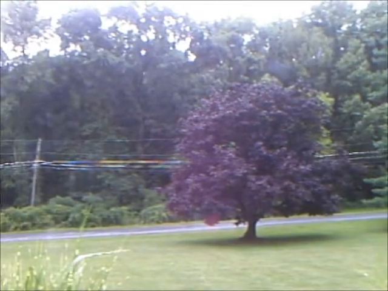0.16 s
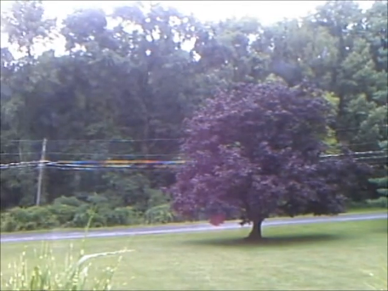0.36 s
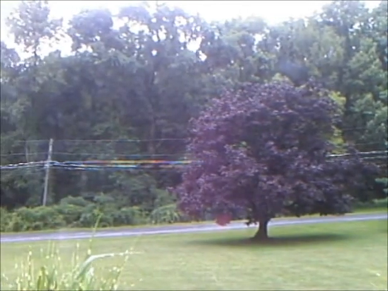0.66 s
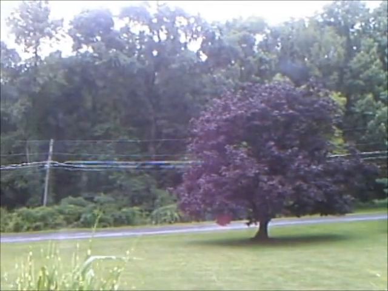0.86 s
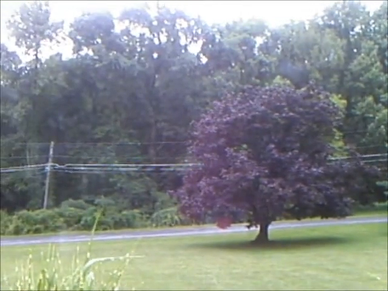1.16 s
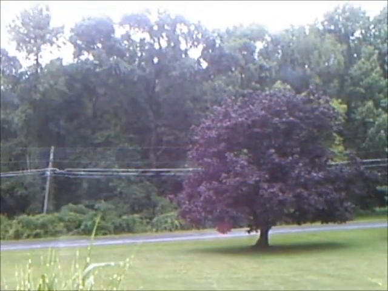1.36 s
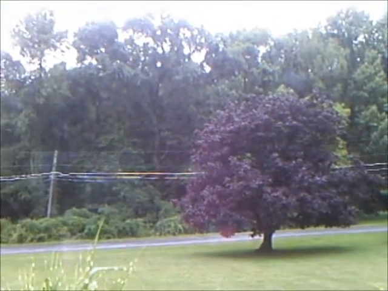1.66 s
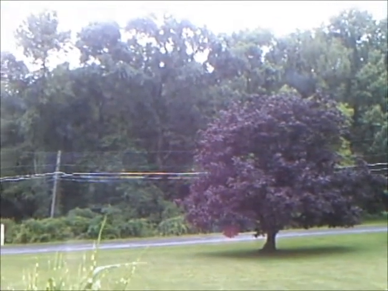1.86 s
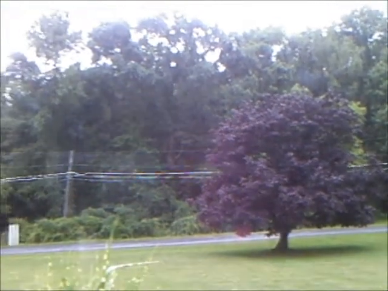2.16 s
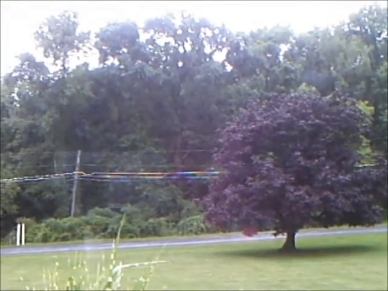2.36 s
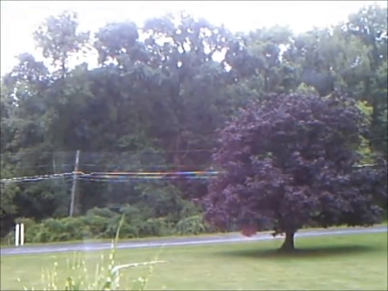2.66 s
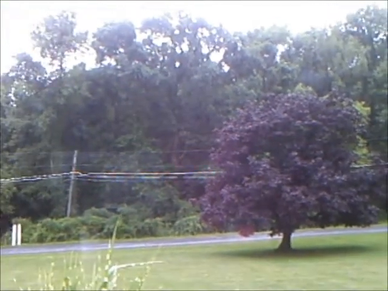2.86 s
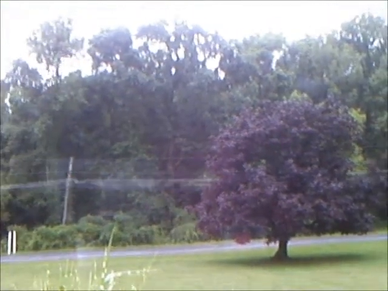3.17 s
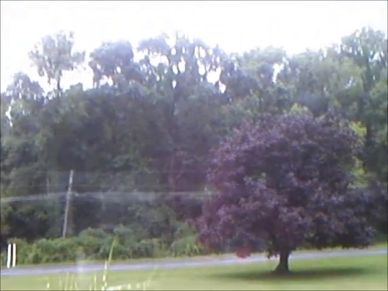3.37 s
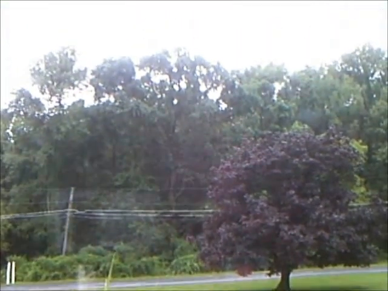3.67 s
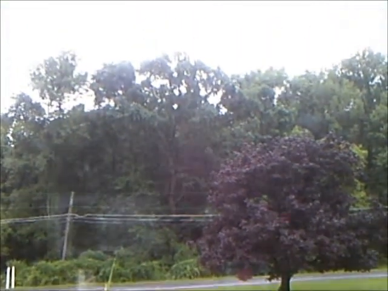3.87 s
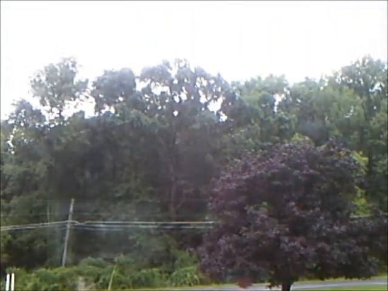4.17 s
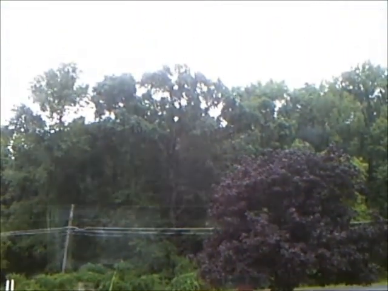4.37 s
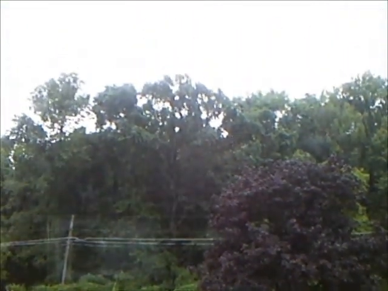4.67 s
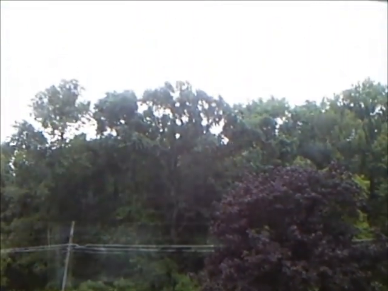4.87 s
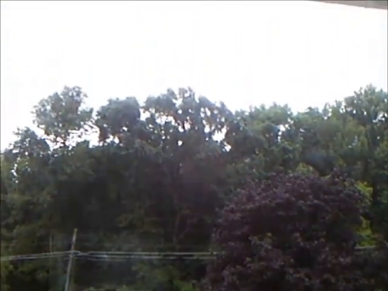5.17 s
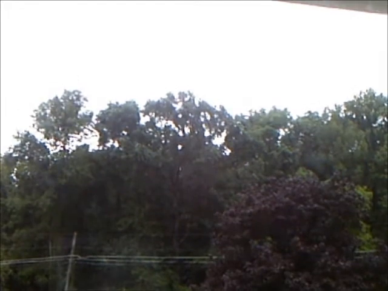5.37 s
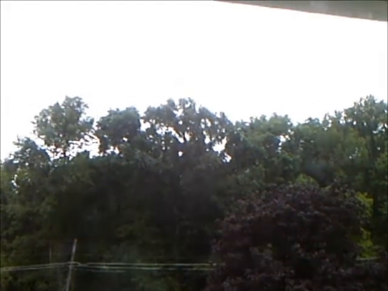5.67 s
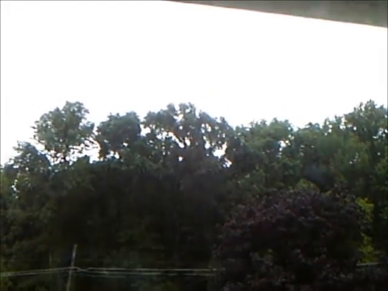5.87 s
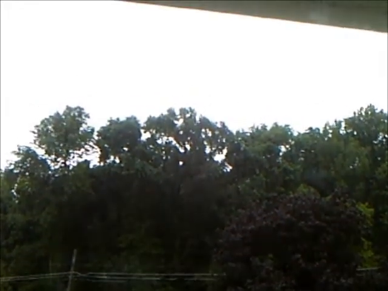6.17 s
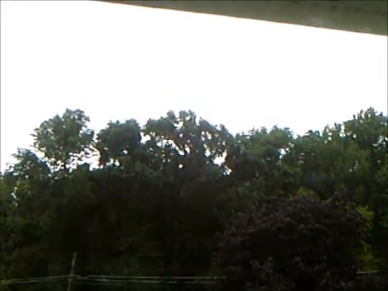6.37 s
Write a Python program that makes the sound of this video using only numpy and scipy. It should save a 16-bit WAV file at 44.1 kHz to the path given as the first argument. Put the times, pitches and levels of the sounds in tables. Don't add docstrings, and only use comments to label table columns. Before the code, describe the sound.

Mono, outdoors from a sheltered porch: steady wash of wind in distant foliage, hollow and slightly coloured by the porch, over low rumble and irregular buffeting puffs. Near leaves hiss lightly. A wavering motor drone is strongest at first, then recedes. A cricket chirps about three times a second, a katydid pulses very high, and electrical hum and buzz sit underneath. Wind slackens after three seconds and picks up around six.

```python
import sys
import numpy as np
from scipy import signal
from scipy.io import wavfile
from scipy.ndimage import uniform_filter1d

SR = 44100
rng = np.random.default_rng(int(sys.argv[2]) if len(sys.argv) > 2 else 0)


def master_out(mix):
    frames = np.transpose(np.atleast_2d(mix))
    ceiling = np.clip(frames, -1, 1)
    pcm = np.round(ceiling * 32767).astype(np.int16)
    wavfile.write(sys.argv[1], SR, pcm)


def decibels_to_gain(level_db):
    exponent = np.asarray(level_db, float) / 20
    return 10 ** exponent


N = 287091
STEP = 128
TIME = np.arange(N) / SR
SLOW = np.arange(0, N + STEP, STEP) / SR


def rms_one(x):
    return x / np.sqrt(np.mean(x ** 2) + 1e-20)


def columns(rows, s):
    at, *values = np.transpose(rows)
    return [np.interp(s, at, v) for v in values]


def drift(rate_hz):
    r = np.exp(-2 * np.pi * rate_hz * STEP / SR)
    white = rng.standard_normal(len(SLOW) + 1000)
    return rms_one(signal.lfilter([1], [1, -2 * r, r * r], white)[1000:])


def audio_rate(control):
    return np.interp(TIME, SLOW, control)


def wind(patchy_db=.8, flicker_db=.5, lumpy_db=.6):
    low, middle = np.geomspace(13, 450, 25), np.geomspace(450, 8350, 44)[1:]
    edges_hz = np.r_[low, middle, 9300, 10500, 12500, 14500, 17000]
    hz, width_hz = np.sqrt(edges_hz[1:] * edges_hz[:-1]), np.diff(edges_hz)
    near_db, far_db = wind_strength_db()
    air_db = puffs_db()
    power = buffeting(near_db, air_db, hz, width_hz) + rumble(near_db, air_db, hz, width_hz)
    power = power + foliage(far_db, hz, width_hz) + leaves(hz, width_hz)
    power = power + microphone_hiss(hz, width_hz) + gusts(hz, width_hz)
    power = power + porch_resonances(hz, width_hz) + rustles(hz, width_hz)
    power = power + low_noises(hz, width_hz) + twig(hz, width_hz)

    patches = uniform_filter1d([drift(2.0) for _ in hz], size=4, axis=0) * 2
    depth_db = patchy_db * (hz < 8400) + lumpy_db * (hz < 250)
    white = rng.standard_normal((3, N + SR // 2))
    out = np.zeros(N)
    for k, band_hz in enumerate(zip(edges_hz, edges_hz[1:])):
        band = signal.butter(2, band_hz, "band", fs=SR, output="sos")
        noise = signal.sosfilt(band, white[k % 3])[SR // 2:]
        gain = np.sqrt(power[k]) * decibels_to_gain(depth_db[k] * patches[k] + flicker_db * drift(14))
        out += audio_rate(gain) * rms_one(noise)
    return out


# time in seconds, rumble at the porch in dB, roar in the far trees in dB.
WIND = [
    (0, -30.5, -43),
    (.3, -33.5, -42.5),
    (.55, -37, -42),
    (1.3, -37, -41),
    (2.2, -38, -41.5),
    (3.1, -42, -44),
    (4, -42.5, -45),
    (5.6, -43.5, -46.5),
    (6.2, -41.5, -45),
    (6.51, -39.5, -46),
]


def wind_strength_db():
    return columns(WIND, SLOW)


# centre in seconds, half length in seconds, change in dB.
PUFFS = [(0.102, .1, 5.5), (.4, 0.091, 7), (1.16, 0.025, 3), (1.425, 0.078, 9.5), (1.745, 0.073, -6),
         (1.9, 0.14, 4), (2.29, 0.068, -7), (2.83, .12, 2), (3.337, 0.089, 1.5), (3.943, 0.055, -7),
         (4.2, 0.14, 3), (4.45, .04, -10), (4.56, 0.045, 4.5), (5.424, 0.13, 7), (5.797, .05, 5),
         (6.33, .06, 3.5)]


def puffs_db():
    return sum(db * np.exp(-.5 * ((SLOW - s) / half_s) ** 2) for s, half_s, db in PUFFS)


def layer(spectrum, level_db, hz, width_hz):
    at_hz, db = np.transpose(spectrum)
    density_db = np.interp(np.log(hz), np.log(at_hz), db, left=-200, right=-200)
    power = decibels_to_gain(density_db) ** 2 * width_hz
    return (power / power.sum())[:, None] * decibels_to_gain(level_db) ** 2


# frequency in Hz, density in dB per Hz.
BUFFETING = [(10, -10), (14, -8), (23, -4), (33, -11), (44, 0), (52, -8), (62, -12), (70, -22), (90, -50)]


def buffeting(near_db, air_db, hz, width_hz, mean_db=-38, follows=.6):
    level_db = mean_db + follows * (near_db - near_db.mean()) + air_db
    return layer(BUFFETING, level_db, hz, width_hz)


# frequency in Hz, density in dB per Hz.
RUMBLE = [(45, -20), (66, -3), (90, 0), (110, -2), (150, -.5), (190, -2.5), (250, -3), (300, -6),
          (380, -12), (480, -21), (620, -45)]


def rumble(near_db, air_db, hz, width_hz, puff_share=0.11):
    return layer(RUMBLE, near_db + puff_share * air_db, hz, width_hz)


# frequency in Hz, density in dB per Hz.
FOLIAGE = [(300, -40), (450, -8), (600, -5), (760, -4.5), (880, 2), (1050, -5), (1250, -4.5), (1440, -7.5),
           (1620, -9.5), (1760, -11.5), (2300, -15), (3000, -19.5), (3500, -23.5), (4400, -52)]


def foliage(far_db, hz, width_hz):
    return layer(FOLIAGE, far_db, hz, width_hz)


# frequency in Hz, density in dB per Hz.
LEAVES = [(2200, -22), (3100, -5), (3800, -2.5), (5200, -2), (5900, 0), (6550, -1), (7000, -5), (7700, -7),
          (8200, -9), (8700, -30), (10000, -45)]


def leaves(hz, width_hz, level_db=-59.5):
    return layer(LEAVES, level_db, hz, width_hz)


# frequency in Hz, density in dB per Hz.
MICROPHONE = [(3000, -2), (8000, 1.5), (12000, 2), (16000, 0.5)]


def microphone_hiss(hz, width_hz, level_db=-66.5):
    return layer(MICROPHONE, level_db, hz, width_hz)


def hump(centre_hz, octaves, level_db, hz, width_hz):
    away = np.abs(np.log2(hz[:, None] / centre_hz) / octaves)
    shape = np.exp(-.5 * away ** 2.63) * (width_hz / hz)[:, None]
    return decibels_to_gain(level_db) ** 2 * shape / shape.sum(axis=0)


def swell_db(start_s, end_s, level_db, rise_db_per_s=45, fall_db_per_s=33):
    early_s, late_s = np.maximum(start_s - SLOW, 0), np.maximum(SLOW - end_s, 0)
    return level_db - rise_db_per_s * early_s - fall_db_per_s * late_s


def fixed_humps(rows, hz, width_hz):
    return sum(hump(centre_hz, octaves, swell_db(start_s, end_s, db), hz, width_hz)
               for start_s, end_s, centre_hz, octaves, db in rows)


# full from and to in seconds, first and last centre in Hz, level in dB.
GUSTS = [
    (-.1, 0.26, 770, 830, -40.5),
    (1.352, 2.29, 2420, 1910, -50),
    (2.4, 3.4, 1570, 1190, -49.5),
    (6.043, 6.43, 1233, 1030, -39),
]


def gusts(hz, width_hz):
    power = 0
    for start_s, end_s, from_hz, to_hz, db in GUSTS:
        centre_hz = np.interp(SLOW, [start_s, end_s], [from_hz, to_hz])
        level_db = swell_db(start_s, end_s, db, rise_db_per_s=66, fall_db_per_s=28)
        power = power + hump(centre_hz, .26, level_db, hz, width_hz)
    return power


# full from and to in seconds, centre in Hz, spread in octaves, level in dB.
RIDGES = [(-.1, .0, 453.6, 0.65, -39.5), (1.1, 0.41, 420, 0.64, -49), (0.473, 0.71, 885, 0.12, -38.5),
          (0.79, 0.82, 956, 0.2, -42.5), (0.99, 1.14, 860, 0.19, -45), (1.3, 2.34, 1255, .06, -49.5),
          (2.5, 3.06, 1232, 0.048, -47.5), (3.34, 4.34, 1250, .06, -51.5), (4.5, 5.106, 1210, 0.16, -48.5),
          (5.3, 6.14, 1215, 0.11, -53.5), (.9, 2.1, 1680, 0.053, -56.5), (2.34, 3.34, 1540, 0.047, -54),
          (3.46, 6.6, 1525, 0.038, -57.5), (-.1, 1.06, 2007, 0.033, -59.5), (1.3, 2.2, 2050, .036, -56),
          (-.1, 1.24, 2620, .04, -64.5), (3.06, 4.5, 2550, .03, -61.5), (5.0, 5.7, 2450, 0.12, -60),
          (-.1, 0.56, 4330, 0.086, -61.5), (1.0, 1.49, 4400, .06, -65), (1.66, 3.5, 4350, 0.075, -68.5)]


def porch_resonances(hz, width_hz):
    return fixed_humps(RIDGES, hz, width_hz)


# full from and to in seconds, centre in Hz, spread in octaves, level in dB.
RUSTLES = [
    (-.1, 1.4, 4800, .47, -59),
    (1.08, 1.28, 5200, .55, -62),
    (4.25, 4.95, 4300, .4, -65),
    (5.75, 6.6, 5000, .55, -64),
    (.45, .9, 7560, .055, -73),
    (1.1, 1.3, 7700, .07, -67),
]


def rustles(hz, width_hz):
    return fixed_humps(RUSTLES, hz, width_hz)


# full from and to in seconds, centre in Hz, spread in octaves, level in
# dB.
LOW_NOISES = [
    (3.2, 3.46, 20, 0.42, -37.5),
    (2.8, 6.6, 88, 0.21, -49),
    (3.65, 3.85, 190, 0.32, -46.5),
    (5.92, 6.6, 165, 0.38, -45),
]


def low_noises(hz, width_hz):
    return fixed_humps(LOW_NOISES, hz, width_hz)


# full from and to in seconds, centre in Hz, spread in octaves, level in dB.
SNAP = (6.075, 6.11, 7600, .07, -67)


def twig(hz, width_hz):
    start_s, end_s, centre_hz, octaves, db = SNAP
    return hump(centre_hz, octaves, swell_db(start_s, end_s, db, 800, 800), hz, width_hz)


# time in seconds, pitch in Hz, level in dB.
DRONE = [
    (0, 180, -45),
    (.5, 178.5, -45),
    (1, 177, -45),
    (1.6, 175, -47),
    (2.2, 176, -53),
    (3.0, 177, -55),
    (3.6, 178, -52),
    (4.2, 177, -57),
    (6.51, 177, -62),
]


def motor(waver_db=2.5, lower_db=-52.0):
    hz, level_db = columns(DRONE, TIME)
    waver = audio_rate(decibels_to_gain(waver_db * drift(3.5)))
    lower_waver = audio_rate(decibels_to_gain(waver_db * drift(3.5)))
    turn = 2 * np.pi * np.cumsum(hz / 3) / SR
    third = decibels_to_gain(level_db) * waver * np.sin(3 * turn)
    second = decibels_to_gain(lower_db) * lower_waver * np.sin(2 * turn)
    return np.sqrt(2) * (third + second)


# first of four strokes in seconds, level in dB.
CHIRPS = [(0.003, -63), (0.278, -64), (0.643, -59), (0.945, -60), (1.263, -62), (1.632, -57), (2.041, -60),
          (2.391, -59), (2.732, -61), (3.089, -61), (3.431, -62), (3.757, -62), (4.07, -60), (4.406, -64),
          (4.725, -61), (5.117, -59), (5.444, -63), (5.745, -64), (6.126, -61), (6.44, -61)]


def cricket(wing_hz=5770, rise_hz=20, gap_s=.0312, stroke_s=.005, gain_db=2.1):
    out, uneven = np.zeros(N), rng.normal(0, 1, (len(CHIRPS), 4, 3))
    for (s, level_db), strokes in zip(CHIRPS, uneven):
        for k, (loud, sharp, late) in enumerate(strokes):
            middle = round((s + k * gap_s + .001 * late) * SR)
            near = np.arange(max(middle - 900, 0), min(middle + 900, N))
            t = (near - middle) / SR
            hz = wing_hz + k * rise_hz + 22 * sharp
            bell = decibels_to_gain(level_db + gain_db + 0.81 * loud) * np.exp(-.5 * (t / stroke_s) ** 2)
            out[near] += bell * np.sin(2 * np.pi * hz * t)
    return out


def katydid(level_db=-64.5, weak=.4, sharp=2.5):
    wing_hz, pair_hz, throb_hz, first_s = 8218, 61.6, 7.654, .093
    turn = 2 * np.pi * pair_hz * TIME
    strokes = np.exp(sharp * (np.cos(2 * turn) - 1)) * (1 + weak * np.cos(turn))
    throb = np.clip(0.33 + np.cos(2 * np.pi * throb_hz * (TIME - first_s)), 0, 1)
    carried = audio_rate(decibels_to_gain(1.9 * drift(1.0)))
    return decibels_to_gain(level_db) * carried * throb * strokes * np.sin(2 * np.pi * wing_hz * TIME)


# centre in Hz, width in Hz, level in dB.
CHORUS = [
    (6010, 110, -73.5),
    (6530, 160, -74),
]


def chorus(depth_db=2.5):
    out = np.zeros(N)
    for hz, width_hz, level_db in CHORUS:
        band = signal.butter(2, [hz - width_hz / 2, hz + width_hz / 2], "band", fs=SR, output="sos")
        swell = audio_rate(decibels_to_gain(level_db + depth_db * drift(4.0)))
        out += swell * rms_one(signal.sosfilt(band, rng.standard_normal(N)))
    return out


# multiple of the mains frequency, level in dB, phase in radians.
HUM = [
    (1, -40, 2.5),
    (2, -46, .3),
]
# time into the half cycle in ms, height in full scale.
SPIKES = [(2.674, .0024), (2.786, -.0022), (2.915, .0011), (3.252, .0013), (3.40, -.0007), (3.452, .0013),
          (3.705, .0009), (6.10, -.0012), (6.155, .0052), (6.235, -.0016), (6.345, .0010)]


def mains(mains_hz=59.9654, spike_ms=.0155, spike_db=1.4, low_cut_hz=2000):
    hum = sum(np.sqrt(2) * decibels_to_gain(db) * np.cos(2 * np.pi * k * mains_hz * TIME + rad) for k, db, rad in HUM)
    half, since_s = np.divmod(TIME, .5 / mains_hz)
    spikes = sum(height * np.exp(-.5 * ((1000 * since_s - ms) / spike_ms) ** 2) for ms, height in SPIKES)
    pickup = signal.butter(1, low_cut_hz, "high", fs=SR, output="sos")
    return hum + decibels_to_gain(spike_db) * signal.sosfilt(pickup, spikes * (-1) ** half)


def scene():
    return (wind() + motor() + cricket() + katydid() + chorus() + mains())[None]


def top_cut(x):
    return signal.sosfilt(signal.butter(12, 15745, fs=SR, output="sos"), x)


def record(dry):
    return top_cut(dry)


dry = scene()
out = record(dry)
master_out(out)
```